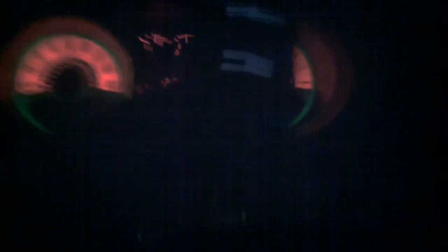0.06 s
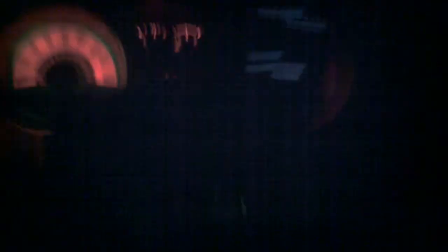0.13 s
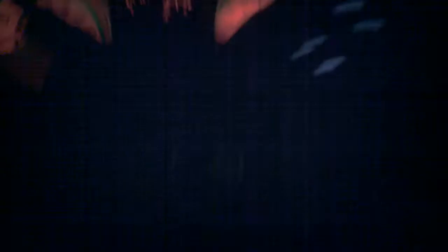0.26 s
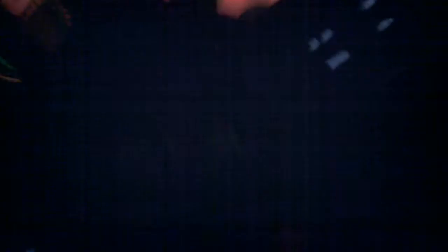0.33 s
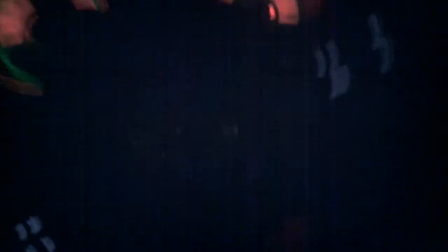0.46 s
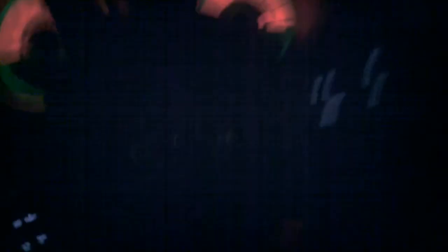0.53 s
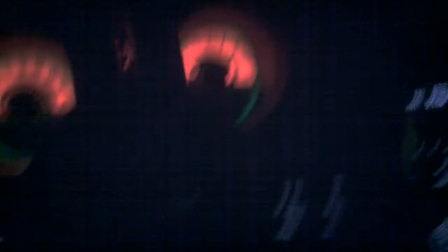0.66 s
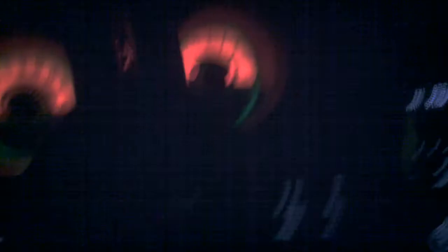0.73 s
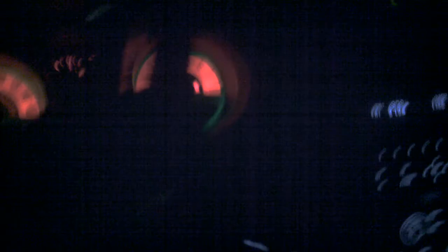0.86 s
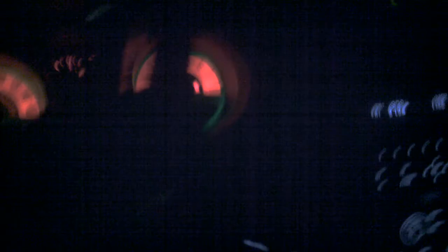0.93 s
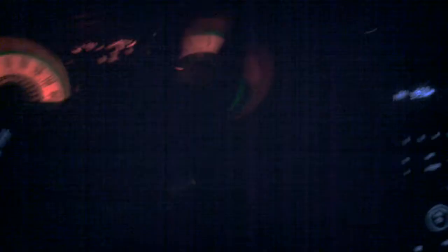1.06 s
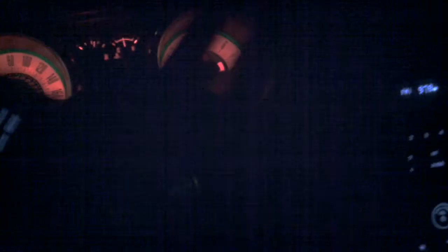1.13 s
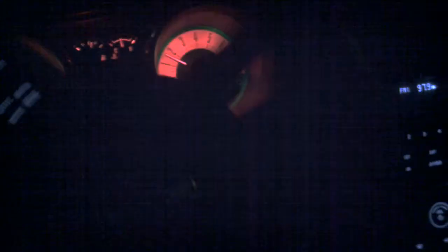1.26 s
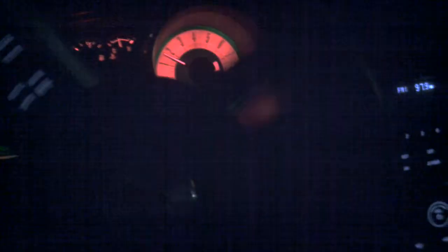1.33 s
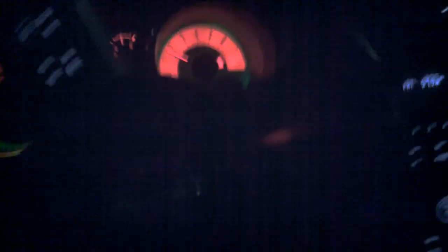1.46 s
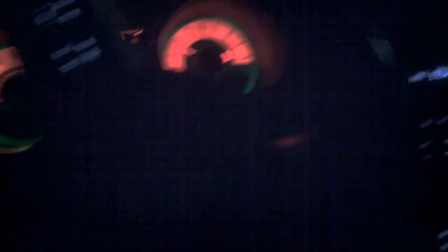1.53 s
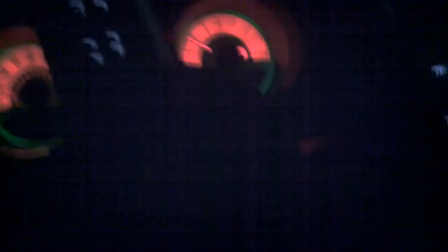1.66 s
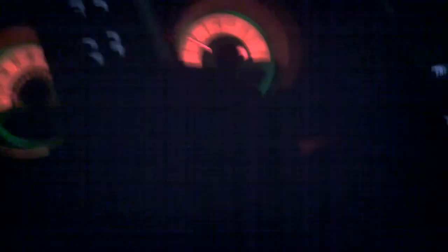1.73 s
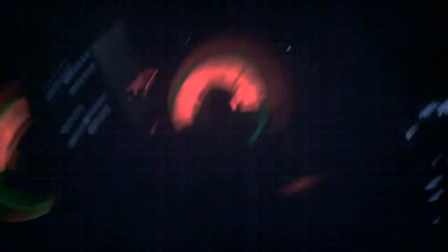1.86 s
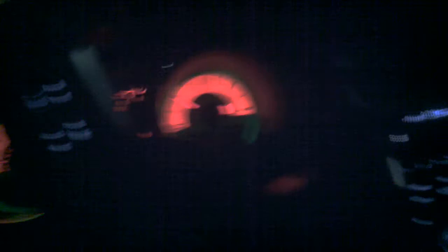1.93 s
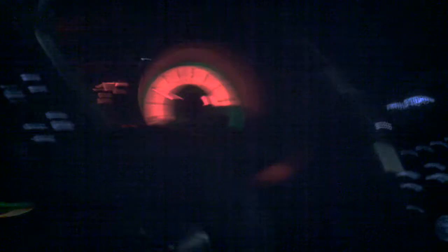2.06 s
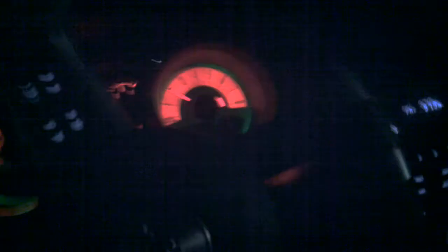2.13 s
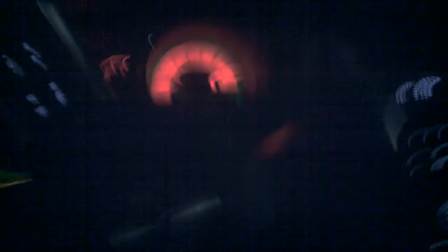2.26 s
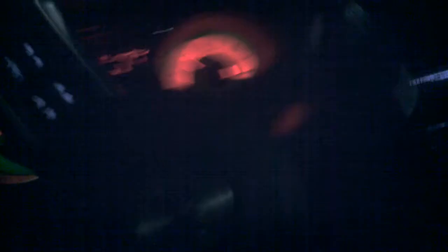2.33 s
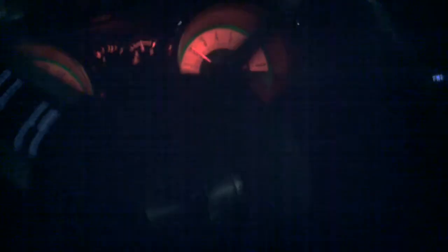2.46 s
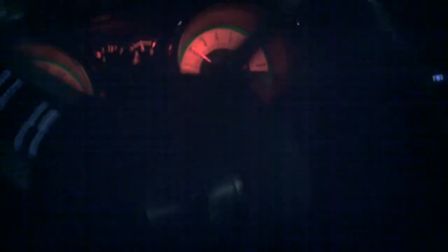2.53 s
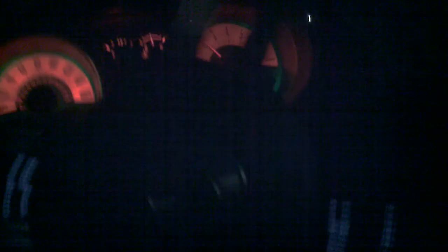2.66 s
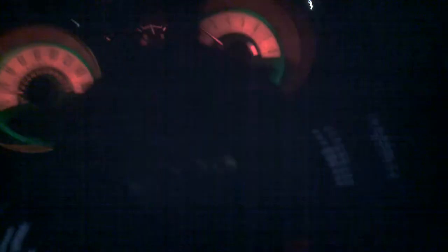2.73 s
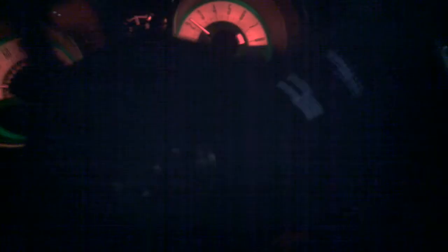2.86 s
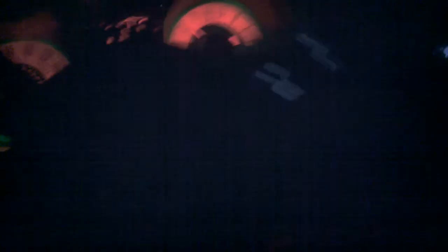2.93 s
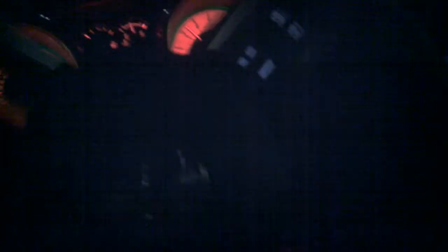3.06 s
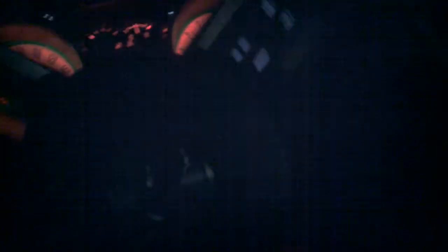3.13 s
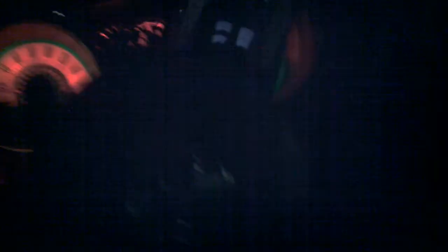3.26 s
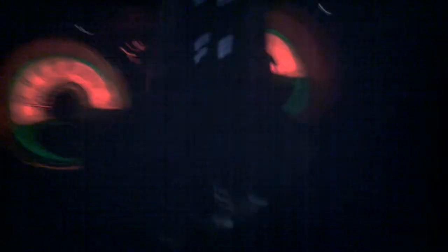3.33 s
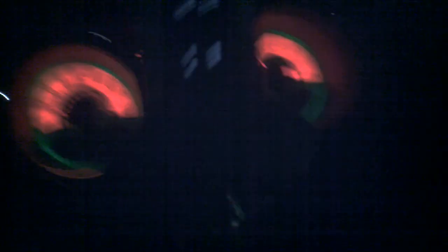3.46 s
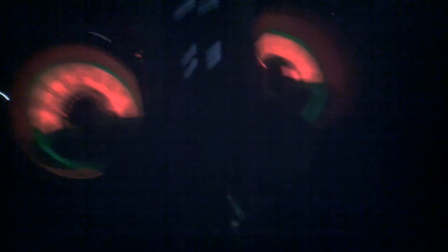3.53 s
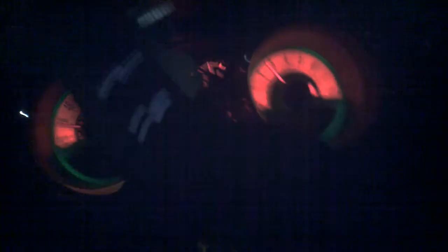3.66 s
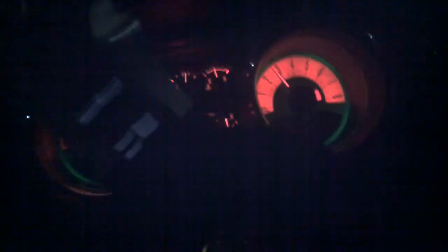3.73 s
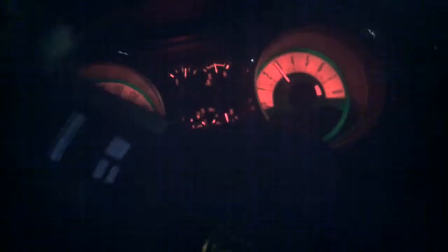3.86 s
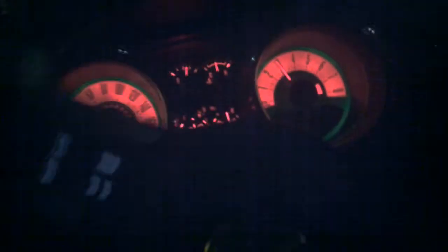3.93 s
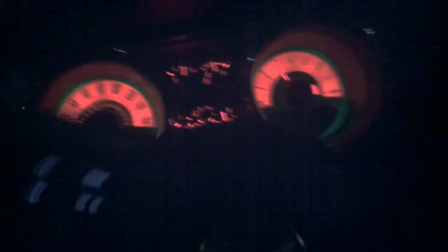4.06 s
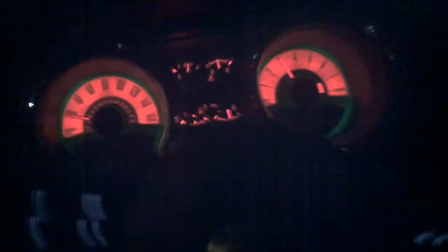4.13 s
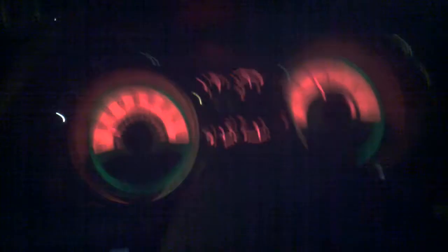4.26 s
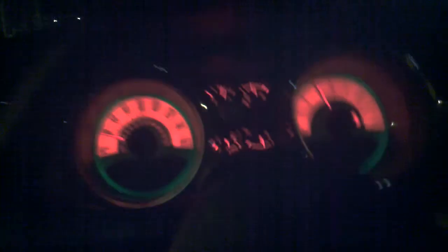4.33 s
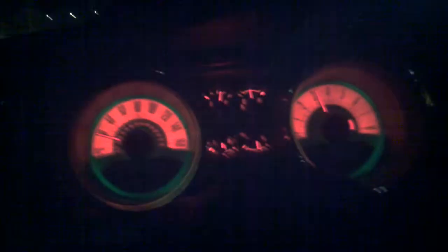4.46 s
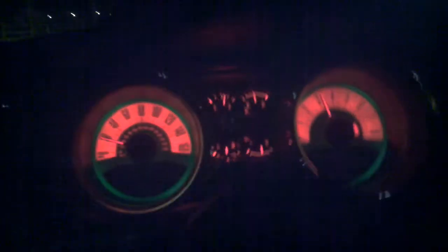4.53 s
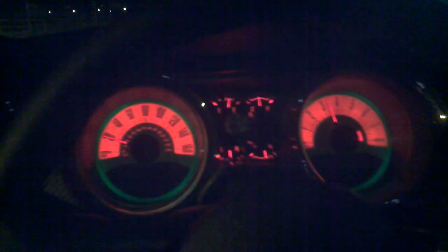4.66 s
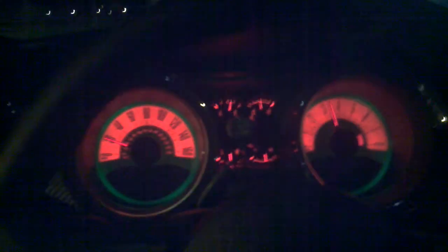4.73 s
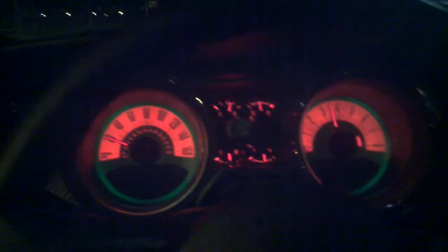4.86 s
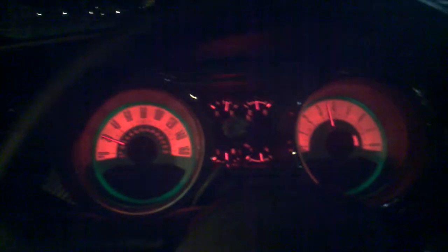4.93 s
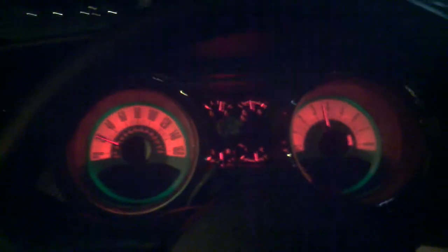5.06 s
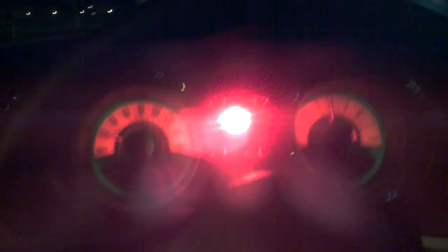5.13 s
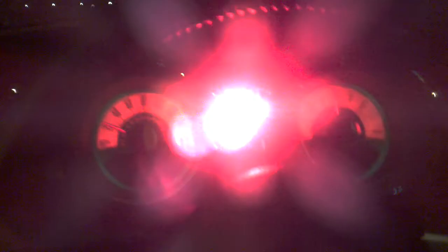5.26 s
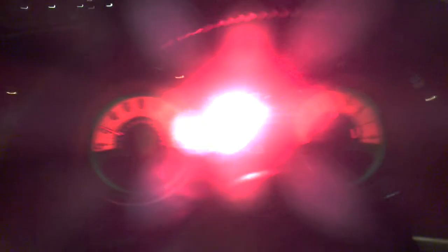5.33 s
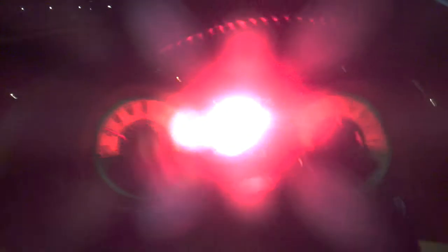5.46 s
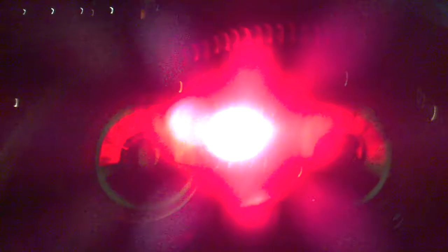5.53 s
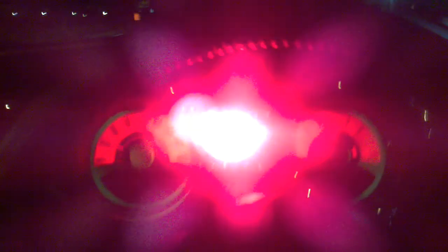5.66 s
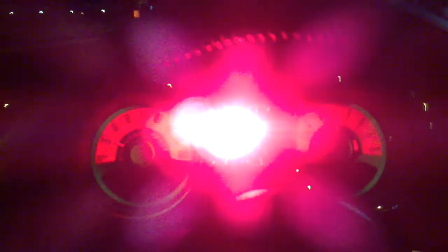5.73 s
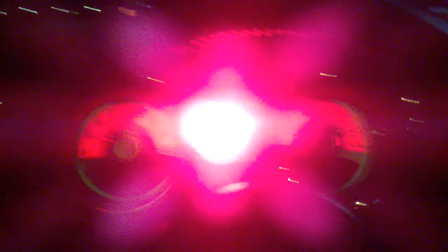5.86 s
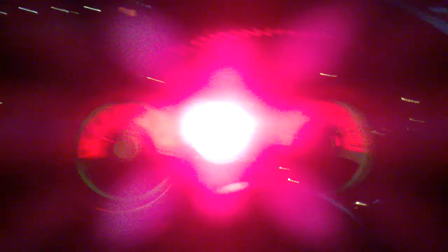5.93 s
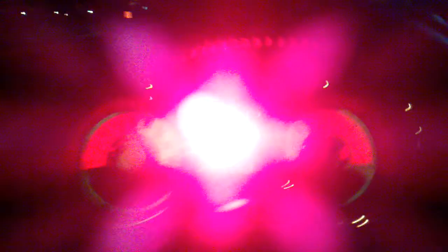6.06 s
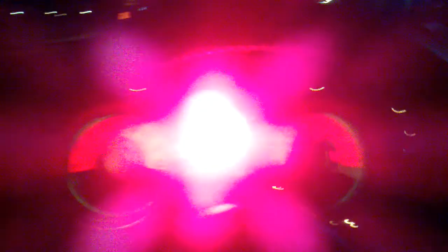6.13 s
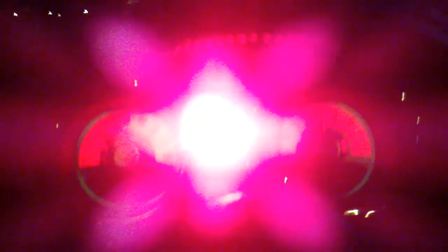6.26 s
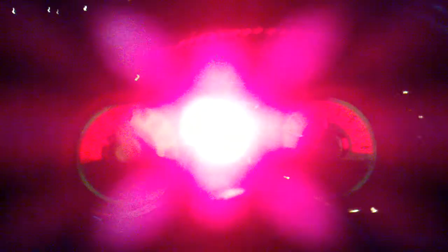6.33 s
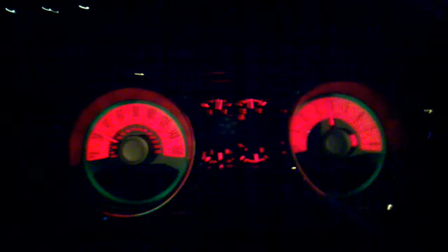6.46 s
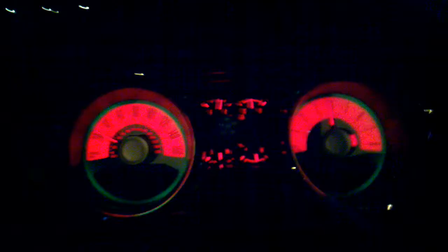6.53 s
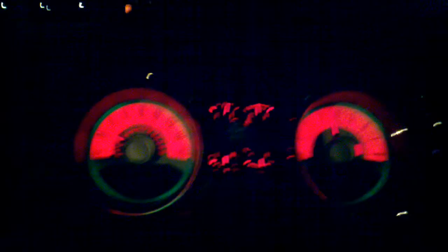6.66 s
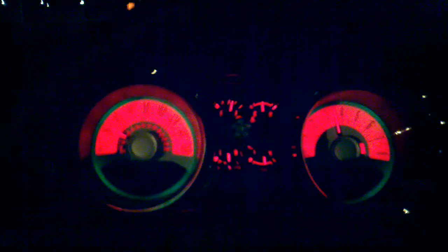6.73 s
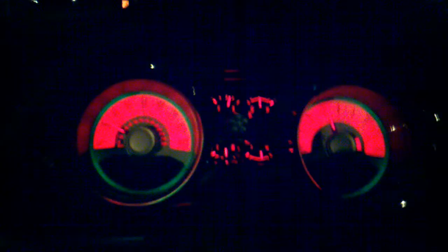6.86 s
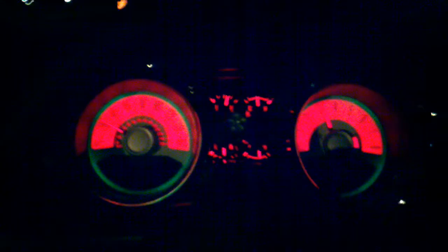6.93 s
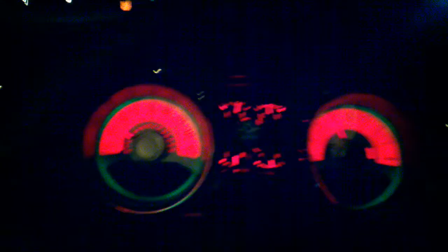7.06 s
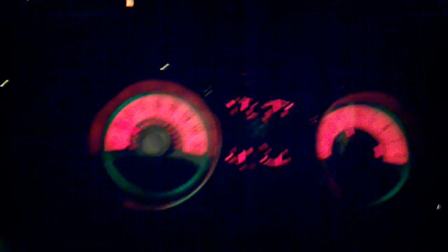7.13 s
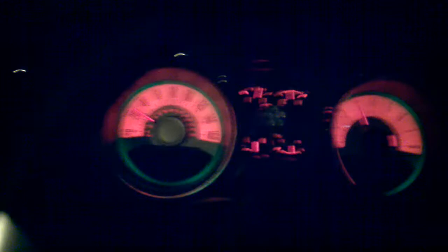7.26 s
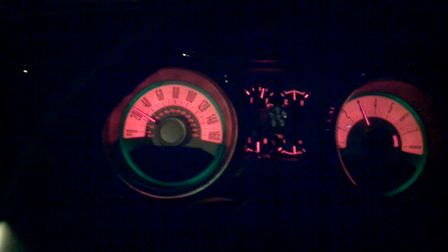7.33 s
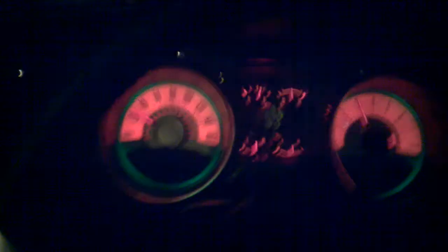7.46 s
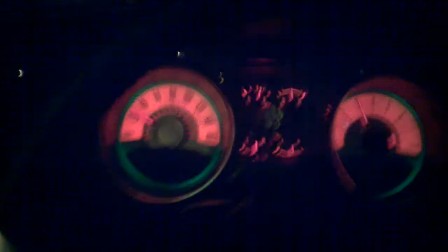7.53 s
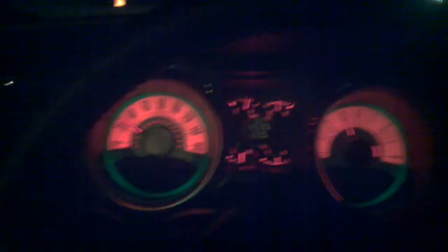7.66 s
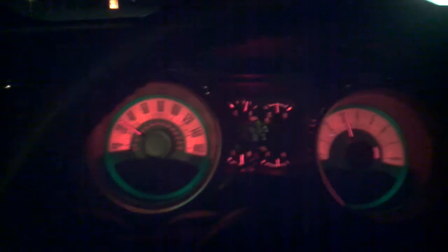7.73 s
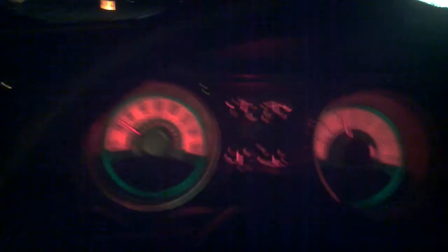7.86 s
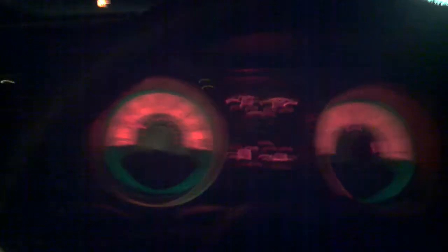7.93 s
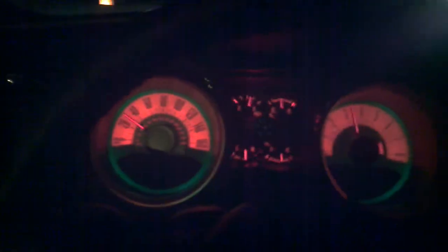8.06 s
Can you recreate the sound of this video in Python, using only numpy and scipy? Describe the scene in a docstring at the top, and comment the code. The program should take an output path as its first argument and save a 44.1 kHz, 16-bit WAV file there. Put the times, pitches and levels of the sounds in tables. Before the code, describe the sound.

The sound is inside a car at the driver's seat, picked up close by a small stereo microphone with even, faint hiss. At 0 s a V8 turns slowly in a deep, uneven throb. Light plastic knocks and a short scrape come in the first 0.4 s; delicate key jingles scatter until about 3.2 s, with a sharper trim knock at 1.9 s. A faint belt whine rises early. The pitch climbs steadily, orders swelling and beating in the cabin; from 4 s the throb becomes a ragged growl, then a full roar with intake rasp and airy hiss, peaking near 5.9 s. The pedal lifts: between 6 and 6.6 s pitch and level drop with lumpy burbling, muffled pops and a trim knock at 6.5 s. Around 7 s keys clink once and the throttle reopens; the engine roars again at lower pitch, climbing until it stops at about 8 s.

```python
"""Driver's seat of a V8 car: it pulls through one long gear, lifts off for an upshift and pulls again.
One crank and one pedal drive firing, boom, gas flow and growl; strong orders swell in cabin resonances.
The uneven firing pattern sweeps through pipes and cabin, throbbing at first, then roaring under intake hiss.
Around the lift it burbles and pops; keys jingle faintly and the trim knocks and scrapes.
A small stereo microphone adds even hiss."""
import sys
import numpy as np
from scipy import signal
from scipy.fft import rfft, irfft
from scipy.io import wavfile

SR = 44100
rng = np.random.default_rng(int(sys.argv[2]) if len(sys.argv) > 2 else 0)


def transcribe(signal):
    """Save signal, clipped to [-1, 1], as a 16-bit WAV file at the path in sys.argv[1]."""
    frames = np.atleast_2d(signal).T
    limited = np.clip(frames, -1, 1)
    pcm = np.round(limited * 32767).astype(np.int16)
    wavfile.write(sys.argv[1], SR, pcm)


N = 356328
TIME, HZ = np.arange(N) / SR, np.fft.rfftfreq(N, 1 / SR)
CRUISE_HZ = 20  # reference cycle rate; one cycle = two crank turns = eight firings

# broad response of exhaust and cabin: freq_hz, gain_db
BODY_SLOPE = [(20,-29.5),(42,-22.5),(55,-11.5),(72,-1.5),(100,8.5),(140,7.5),(180,1),(238,-5),(340,1),(500,-6),(720,-16),(1000,-17),(1300,-24),(1650,-28),(2100,-32.5),(2800,-53.5)]
# strongest orders: multiple of cycle rate, shut_db at CRUISE_HZ, throttle_db added when full,
# octave_db per octave of revs
STRONG_ORDERS = [(4, -55, -9, 11.5), (5, -63.5, 5.5, 17), (6, -52.5, 10, 9), (7, -48, 7, 10),
                 (8, -64.5, 49.5, -17.5), (9, -50.5, 0, 1), (10, -53.5, 11, -2), (11, -59.0, 6, 2),
                 (12, -62, 4.5, 9), (13, -55.5, 11.5, 7.5), (14, -53, 12, 0), (15, -52.5, 16, 0.5),
                 (16, -53.0, 26, 0.5), (18, -55.5, 14.5, 5.5), (21, -57, 25, 7), (24, -67, 52.5, -7)]


def amp(db):
    """Decibels to gain."""
    return 10 ** (np.asarray(db) / 20)


def unit(x):
    """Scales to rms 1."""
    return x / np.sqrt(np.mean(x ** 2) + 1e-20)


def curves(rows):
    """Each column of a time table, sample by sample."""
    s, *columns = np.transpose(rows)
    return [np.interp(TIME, s, column) for column in columns]


def read(rows, hz=HZ, axis=1):
    """A column of a frequency table, interpolated on a log axis."""
    rows = np.array(rows)
    return np.interp(np.log(hz + 1), np.log(rows[:, 0] + 1), rows[:, axis])


def colour(x, gain):
    """Filters by a gain per frequency."""
    return irfft(rfft(x) * gain, x.shape[-1])


def peaks(rows, hz=HZ):
    """Gain in dB of a set of resonances."""
    return sum(db / (1 + (2 * (hz - centre) / width) ** 2) for centre, width, db in rows)


def waver(hz, size=4096):
    """Slow random curve of rms 1, low-passed at a rate."""
    f = np.fft.rfftfreq(size, N / SR / size)
    slow = irfft(rfft(rng.standard_normal(size)) / (1 + (f / hz) ** 4))
    return np.interp(TIME, np.linspace(0, TIME[-1], size), unit(slow))


def add(mix, start_s, sound):
    """Mixes a sound in at a time."""
    part = mix[:, max(round(start_s * SR), 0):][:, :sound.shape[1]]
    part += sound[:, :part.shape[1]]


def ports(pair, apart):
    """Two noises become one shared sound and its opposite-signed difference between the ports."""
    return pair[0] + apart * pair[1] * np.array([[1], [-1]])


def driven(law, throttle, speed_hz):
    """Level in dB of a layer that follows throttle and revs."""
    shut_db, throttle_db, octave_db = law
    return shut_db + throttle_db * throttle + octave_db * np.log2(speed_hz / CRUISE_HZ)


def puffs(cycles, depth, lump):
    """Two noises that swell with each firing and once more per cycle."""
    per_firing = 1 + depth * np.cos(2 * np.pi * 8 * cycles)
    per_cycle = 1 + lump * np.cos(2 * np.pi * cycles)
    return rng.standard_normal((2, N)) * per_firing * per_cycle


def self_noise(level_db=-65.0):
    """The even hiss of the microphones."""
    gain_db = read([(4000, -3.5), (12000, 1.5)])
    return amp(level_db) * unit(colour(rng.standard_normal((2, N)), amp(gain_db)))


def scrape(slips_per_s=2600, apart=1.0):
    """Something plastic rubs briefly in a run of tiny slips."""
    # freq_hz, gain_db
    spectrum = [(700,-17.5),(1300,-0.5),(1650,2.5),(2200,-3.5),(3800,-18),(5500,-33)]
    # time_s, level_db
    level = [(.298,-110),(.306,-49),(.322,-53),(.338,-48),(.352,-55),(.36,-110)]
    slips = rng.standard_normal((2, N)) * (rng.random(N) < slips_per_s / SR)
    return unit(colour(ports(slips, apart), amp(read(spectrum)))) * amp(curves(level)[0])


def trim(apart=0.71, ring_db=-1, snap_db=-18.0, snap_s=0.0024, snap_hz=3700, snap_width_hz=900):
    """Loose cabin trim knocks: a plastic snap, a brief rattle and the ring of the panel."""
    # knocks: start_s, rattle_peak_db, tilt_db_per_octave, t60_s
    knocks = [(0.078,-36,1,1),(0.219,-37,3.5,0.31),(0.256,-38,-6,0.042),(0.357,-40.5,6,0.4),(1.8957,-22,-2.5,0.09),(6.546,-27.5,2.5,0.2)]
    # rattle spectrum: freq_hz, gain_db
    spectrum = [(200,-57),(400,9),(520,9.5),(750,1.5),(1400,-9.5),(2200,-17),(3700,-27),(5000,-38),(12000,-39)]
    # panel ring: freq_hz, level_db, t60_s
    modes = [(460,-7.5,0.14),(549,-2.5,0.14),(1020,-22.5,.05),(1460,-18,.04)]
    out, t = np.zeros((2, N)), np.arange(SR // 5) / SR
    hz = np.fft.rfftfreq(len(t), 1 / SR)
    ring = sum(amp(db - 60 * t / t60_s) * np.sin(2 * np.pi * mode_hz * t) for mode_hz, db, t60_s in modes)
    snap_gain = 1 / (1 + ((hz - snap_hz) / snap_width_hz) ** 2)
    for start_s, peak_db, tilt_db, t60_s in knocks:
        gain_db = read(spectrum, hz) + tilt_db * np.log2(np.clip(hz, 200, 4000) / 1000)
        rattle = ports(colour(rng.standard_normal((2, len(t))), amp(gain_db)), apart)
        rattle = rattle * amp(-60 * t / t60_s) * np.minimum(t / 0.00069, 1)
        snap = colour(rng.standard_normal((2, len(t))), snap_gain) * np.exp(-t / snap_s)
        knock = rattle / abs(rattle).max() + amp(ring_db) * ring + amp(snap_db) * snap / abs(snap).max()
        add(out, start_s, amp(peak_db) * knock)
    return out


def keys(lift_db=5.0, settle_s=0.021, contacts_per_s=900, rise_s=0.0026,
         ring_db=-7, ring_t60_s=0.034, tick_s=0.003):
    """Keys slide together in a quick dying flurry of tiny contacts, and one of them rings."""
    # start_s, peak_db (before lift_db), ring_hz
    jingles = [(0.228, -53, 11300), (0.381, -49.5, 12300), (0.411, -54, 12300), (0.7774, -55, 9200),
               (0.9617, -57, 11300), (1.0311, -52, 12200), (1.0665, -40.5, 8650), (1.241, -46, 7000),
               (1.4434, -49, 11500), (1.5004, -52, 12200), (1.5477, -43, 9400), (1.8466, -51, 12100),
               (1.9654, -52, 5700), (2.667, -40.5, 10870), (3.152, -47, 5680), (7.0404, -41.5, 9500)]
    # freq_hz, gain_db
    spectrum = [(3000,-9),(5600,-8),(8000,1),(9200,-3.5),(10500,-8),(12000,5),(14000,-19.5)]
    out, t = np.zeros((2, N)), np.arange(SR // 4) / SR
    metal = amp(read(spectrum, np.fft.rfftfreq(len(t), 1 / SR)))
    flurry = np.exp(-t / settle_s) * np.minimum(t / rise_s, 1)
    for start_s, peak_db, ring_hz in jingles:
        contacts = rng.standard_normal((2, len(t))) * (rng.random(len(t)) < contacts_per_s / SR)
        tick = unit(colour(rng.standard_normal((2, len(t))) * np.exp(-t / tick_s), metal))
        ring = unit(amp(-60 * t / ring_t60_s) * np.sin(2 * np.pi * ring_hz * t))
        clink = tick + amp(ring_db) * ring
        sound = signal.fftconvolve(contacts * flurry, clink, axes=1)[:, :len(t)]
        add(out, start_s, amp(peak_db + lift_db) * sound / abs(sound).max())
    return out


def whine(cycles, multiple=58.4, flutter_db=2.5, slip_rad=0.82):
    """A faint whine of a belt-driven accessory climbs with the revs."""
    # time_s, level_db
    level = [(.3,-62),(.8,-54),(2.1,-62),(2.8,-68),(4.2,-72),(5.2,-99)]
    tone = np.sin(2 * np.pi * multiple * cycles + slip_rad * waver(5.2))
    return amp(curves(level)[0] + flutter_db * waver(4.4)) * tone


def air(cycles, throttle, jitter_cycles=0.00078, size=2048, count=130, tone=1.1):
    """Valves gulp air in a repeating pattern under hiss; intake resonances ring as the throttle opens."""
    # rasp spectrum: freq_hz, gain_db
    rasp_spectrum = [(500,-41.5),(850,0),(1100,0.5),(1330,-4),(1520,1.5),(1800,-1),(2200,-2.5),(2650,-8.5),(3400,-8),(5000,-25.5),(9000,-50)]
    # hiss spectrum: freq_hz, gain_db
    hiss_spectrum = [(1500,-11),(3400,6),(5000,6.5),(7000,0),(9000,0.5),(12000,-7),(14000,-11.5)]
    # intake resonances: freq_hz, width_hz, gain_db
    intake = [(1051,13,24),(1608,40,11.5),(1920,87,8),(2020,35,5)]
    # time_s, level_db
    rasp_level = [(0,-62.5),(1.2,-59.5),(2.5,-57.5),(3.7,-53.5),(4.4,-45.5),(5.3,-37),(5.85,-37.5),(6.1,-45),(6.55,-47.5),(6.75,-50.5),(7.05,-51),(7.35,-37.5),(7.6,-36),(8.08,-37)]
    # time_s, level_db
    hiss_level = [(0,-71),(2.3,-78.5),(3.25,-70.5),(3.45,-67),(4.3,-61.5),(5.5,-51),(5.95,-56.5),(6.08,-52),(6.25,-62),(6.55,-67),(6.95,-70),(7.5,-43),(8.08,-45.5)]
    harmonics = np.exp(2j * np.pi * rng.random((2, count))) * (np.arange(count) > 16)
    patterns = unit(irfft(harmonics, size))
    place = (cycles + jitter_cycles * waver(24)) % 1 * size
    gulps = np.array([np.interp(place, np.arange(size), pattern) for pattern in patterns])
    duct = amp(read(rasp_spectrum))
    gulps = tone * np.sqrt(abs(throttle)) * unit(colour(gulps, duct))
    plain = unit(gulps + unit(colour(puffs(cycles, depth=0.16, lump=0.05), duct)))
    ringing = unit(colour(plain, amp(peaks(intake))))
    rasp = (1 - throttle ** 2) * plain + throttle ** 2 * ringing
    hiss = unit(colour(puffs(cycles, depth=0.076, lump=0.12), amp(read(hiss_spectrum))))
    rasp = rasp * amp(curves(rasp_level)[0] + 1.1 * waver(15))
    return rasp + hiss * amp(curves(hiss_level)[0] + .5 * waver(13))


def pipes():
    """Gain of exhaust and cabin: broad slope plus resonances."""
    # freq_hz, width_hz, gain_db
    resonances = [(118,9.1,1.4),(155,14,7),(215,43,4.3),(287.7,26,5.8),(302,15.7,8.2),(458,24,4.8),(576,57,6.8),(634.7,39,13.3),(779,43,9.2),(853,14,7.3)]
    return amp(read(BODY_SLOPE) + peaks(resonances))


def standing_waves(depth_db=4.0, twist_rad=0.29, spacing_hz=21.94, from_hz=710.0):
    """Higher cabin modes crowd into a ripple at a port, so each rising order swells and fades on its own."""
    grid_hz = np.arange(0, SR / 2, spacing_hz)
    onset = np.minimum(HZ / from_hz, 1) ** 2
    draws = rng.standard_normal((2, len(grid_hz)))
    level, twist = (np.interp(HZ, grid_hz, draw) * onset for draw in draws)
    return amp(depth_db * level) * np.exp(1j * twist_rad * twist)


def pops(body, swell_s=0.0091, low_hz=330, apart=0.13):
    """Larger pockets of fuel go off in the pipes as short muffled bursts."""
    # start_s, level_db
    bursts = [(5.993,-29.5),(6.041,-27.5),(6.073,-29),(6.099,-29.5),(6.188,-33),(6.259,-34.5),(6.361,-42.5),(6.469,-36),(6.519,-33.5)]
    t = np.arange(SR // 8) / SR
    swell = t / swell_s * np.exp(1 - t / swell_s)
    level = np.zeros((1, N))
    for start_s, db in bursts:
        add(level, start_s, amp(db) * swell[None])
    gas = ports(rng.standard_normal((2, N)), apart)
    ring = body * HZ ** 2 / (HZ ** 2 + low_hz ** 2)
    return colour(gas * level, unit(ring))


def burble(cycles, body, spread=.55, low_hz=110, top_hz=260):
    """After the pedal lifts, unburnt fuel puffs unevenly on every second firing."""
    # time_s, level_db
    level = [(5.9,-100),(5.98,-26),(6.2,-30),(6.29,-27),(6.33,-31.5),(6.44,-33.5),(6.5,-26),(6.56,-43),(6.7,-37),(6.95,-47.5),(7.1,-84.5)]
    beats = np.diff(np.floor(4 * cycles), prepend=0) > 0
    strength = 1 + spread * (rng.standard_normal(N) + np.cos(2 * np.pi * cycles))
    muffled = body * HZ ** 2 / (HZ ** 2 + low_hz ** 2) / (1 + (HZ / top_hz) ** 2)
    return unit(colour(beats * strength, muffled)) * amp(curves(level)[0])


def turbulence(cycles, speed_hz, body, apart=0.27, brightening_db=8.0):
    """Ragged gas flow rings the pipes, shifting from rumble to roar as the revs climb."""
    flow = puffs(cycles, depth=0.15, lump=0.043)
    flow = unit(colour(ports(flow, apart), body))
    rumble = colour(flow, 1 / (1 + (HZ / 200) ** 6))
    octaves = np.log2(speed_hz / CRUISE_HZ)
    return rumble * amp(-2.5 - 4.1 * octaves) + (flow - rumble) * amp(2.5 + brightening_db * octaves)


def growl(cycles, speed_hz, throttle, apart=0.69, fade_firings=0.88, uneven_db=3.5):
    """Under load every firing is a ragged blast of its own strength, fading until the next."""
    # freq_hz, gain_db
    spectrum = [(40,-37),(120,-19.5),(200,-1.5),(270,-7.5),(350,3),(420,-4),(580,-7),(690,-8),(880,-7.5),(1050,-32.5),(1350,-26),(2500,-60.5)]
    # shut_db at CRUISE_HZ, throttle_db, octave_db
    law = (-61.5, 25.3, 11.9)
    number, within = np.divmod(8 * cycles, 1)
    strength = amp(uneven_db * rng.standard_normal(N))[number.astype(int)]
    blasts = strength * np.exp(-within / fade_firings)
    sound = colour(ports(rng.standard_normal((2, N)), apart) * blasts, amp(read(spectrum)))
    return unit(sound) * amp(driven(law, throttle, speed_hz))


def firing(cycles, pulse_db, size=2048, count=130, jitter_cycles=0.0016,
           wander_db=3.5, drift_cycles=0.0075, edge=0.5):
    """The pressure of one cycle, repeated: its weaker orders scatter over the eight firings."""
    # uneven firing of the two banks: multiple of cycle rate, level_db
    weak_orders = [(2,-7),(3,-10),(17,-2.5),(19,3),(20,-0.5),(22,3),(23,5),(26,5),(30,10.5),(37,5),(44,4),(60,2),(130,-1.5)]
    k, out = np.arange(count), 0
    phase = rng.uniform(-np.pi, np.pi, count)
    weak = ~np.isin(k, [0] + [row[0] for row in STRONG_ORDERS])
    height = amp(np.interp(k, *np.transpose(weak_orders))) * weak
    uneven = cycles + jitter_cycles * waver(24)  # no two cycles burn quite alike
    family = np.where(k < 25, k % 3, 3 + k % 2)  # each family wanders on its own
    for i in np.unique(family):
        cycle = irfft((family == i) * height * np.exp(1j * phase), size) * size / np.sqrt(2)
        high = i > 2  # the top orders need an open throttle
        level_db = pulse_db + high * edge * (pulse_db + 40.0) + wander_db * waver(1.83)
        place = (uneven + drift_cycles * waver(1.99)) % 1 * size
        out = out + np.interp(place, np.arange(size), cycle) * amp(level_db)
    return out


def boom(cycles, speed_hz, throttle, unsteady_db=0.76, slip_rad=0.044, dispersion_rad=2.556):
    """Strong orders are tones that swell in resonances, beat into a throb and stumble on the overrun."""
    # standing waves at the driver's seat: freq_hz, width_hz, gain_db
    cabin = [(67.5,4.8,5),(96.4,13,7),(108.3,10.5,-12),(144.2,49,12),(177.4,22,-3.5),(223.7,14,3.5),(279.1,13,7),(301.5,43.4,12.5),(402,13,5.5),(456.4,55.5,13),(481,48,-5.5),(664,58,10)]
    seat, out = amp(read(BODY_SLOPE) + peaks(cabin)), 0
    revs = speed_hz / CRUISE_HZ
    shut = (1 - throttle) ** 2
    stumble_rad = 0.6 * np.clip(revs - 1, 0, 1) * shut
    # scales unsteady_db and slip_rad: high revs and a shut throttle unsettle each order
    ragged = (1 + 1.8 * shut) * revs ** 2
    for k, *law in STRONG_ORDERS:
        level_db = driven(law, throttle, speed_hz) + unsteady_db * ragged * waver(5.9)
        gain = amp(level_db) * np.interp(k * speed_hz, HZ, seat)
        # orders further apart fall out of step, which softens the throb
        offset = min(abs(k - 7), 2) * revs
        lag = dispersion_rad * offset ** 2
        scatter = rng.uniform(0, 2 * np.pi) * (k not in (6, 7, 8, 9, 10, 15, 16))
        # orders 15 and 16 thump together, later in the cycle
        lag = lag + 2 * np.pi * k * 0.72 * (k > 10)
        slip = k * stumble_rad * waver(15.2) + slip_rad * ragged * waver(6.4)
        out = out + np.sqrt(2) * gain * np.cos(2 * np.pi * k * cycles - lag + scatter + slip)
    return out


def scene(start_cycles=.45):
    """One crankshaft and one pedal drive the engine; the cabin carries it to the two ports."""
    # time_s, cycles_hz
    speed_table = [(0.0, 8.11), (0.41, 9.07), (0.6, 9.78), (0.78, 11.37), (1.33, 13.65), (2.51, 17.99),
                   (3.43, 21.9), (3.99, 24.75), (4.74, 29.26), (5.54, 33.68), (5.93, 35.32), (6.53, 28.66),
                   (6.65, 27.19), (6.9, 23.09), (7.03, 24.47), (7.2, 24.48), (7.37, 25.33), (8.08, 28.98)]
    # pedal eases down, lifts for the upshift, goes down again: time_s, opening (0-1)
    throttle_table = [(0.0, 0.11), (1.2, 0.23), (1.6, 0.34), (2.3, 0.28), (3.6, 0.42), (4.4, 0.68),
                      (4.9, 0.84), (5.5, 0.91), (5.92, 0.95), (6.02, 0.44), (6.68, 0.0), (6.92, 0.3),
                      (7.04, 0.62), (7.45, 0.85), (8.08, 0.82)]
    # shut_db at CRUISE_HZ, throttle_db, octave_db
    pulse_law = (-59, 17.97, -0.32)
    # shut_db at CRUISE_HZ, throttle_db, octave_db
    flow_law = (-38.5, -0.18, 3.9)
    # standing waves between the ports: freq_hz, left_minus_right_db, left_lead_rad
    port_table = [(66,-4,1.5),(103,7,1.5),(123,2,0.6),(209,1,0.54),(241,8,4.5),(275,4,0.58),(323.6,-8.5,0.76),(334,12.5,3),(400,-4.5,-2),(483.6,7,0.7),(448,-0.5,2),(556,1.5,0.92),(1000,-0.5,-0.1)]
    (speed_hz,), (throttle,) = curves(speed_table), curves(throttle_table)
    cycles, body = start_cycles + np.cumsum(speed_hz) / SR, pipes()
    pulses = firing(cycles, driven(pulse_law, throttle, speed_hz))
    flow = amp(driven(flow_law, throttle, speed_hz)) * turbulence(cycles, speed_hz, body)
    heard = np.array([body * standing_waves() for port in "LR"])
    pulling = boom(cycles, speed_hz, throttle) + colour(pulses, heard) + flow
    pulling = pulling + growl(cycles, speed_hz, throttle)
    engine = pulling + burble(cycles, body) + pops(body) + whine(cycles)
    half = amp(read(port_table) / 2) * np.exp(.5j * read(port_table, axis=2))
    engine = colour(engine, np.array([half, 1 / half]))
    return engine + air(cycles, throttle) + keys() + trim() + scrape() + self_noise()


def record(dry, comb_hz=2650, edge_hz=14050):
    """The recorder widens the treble with opposite combs on sum and difference, then limits the band."""
    # freq_hz, comb depth (0-1)
    depth = read([(850, 0), (1250, .98), (2650, .997), (4000, .98), (6000, .7), (14000, .55)])
    comb = depth * np.cos(2 * np.pi * HZ / comb_hz)
    edge = np.clip((edge_hz - HZ) / 100, 0, 1)
    mid = colour((dry[0] + dry[1]) / 2, np.sqrt(1 - comb) * edge)
    side = colour((dry[0] - dry[1]) / 2, np.sqrt(1 + comb) * edge)
    return np.array([mid + side, mid - side])


dry = scene()
out = record(dry)
transcribe(out)
```